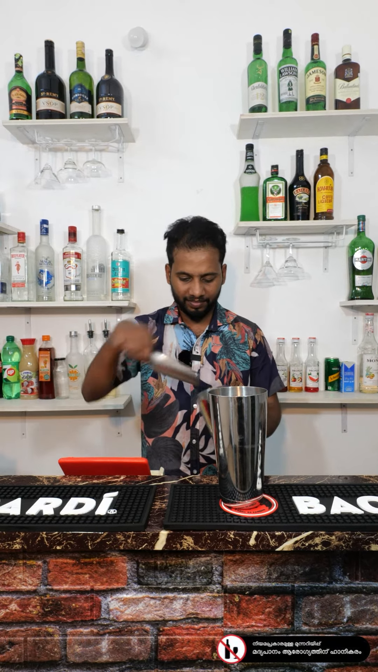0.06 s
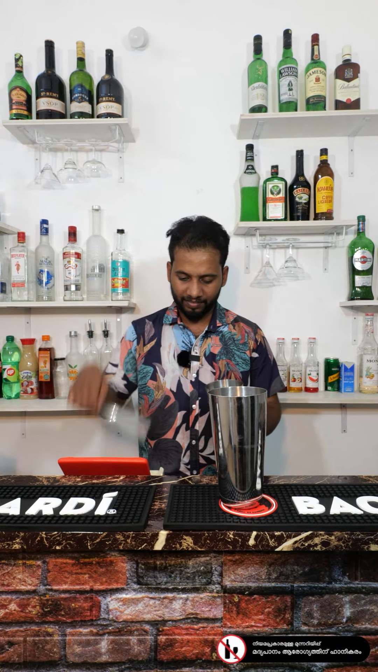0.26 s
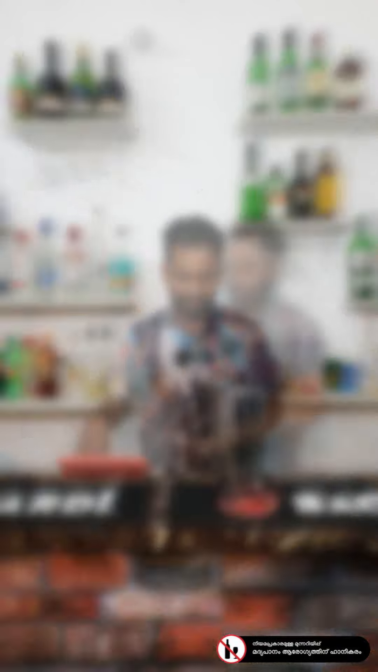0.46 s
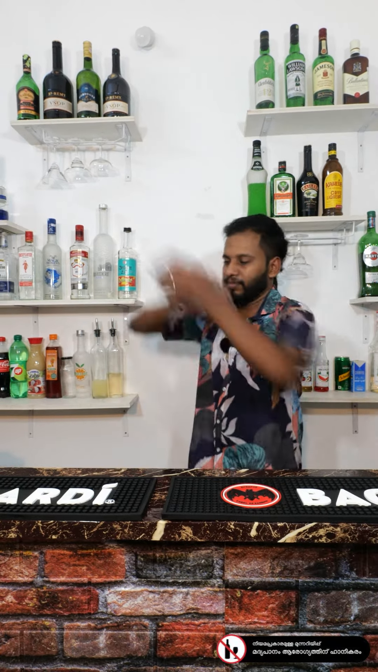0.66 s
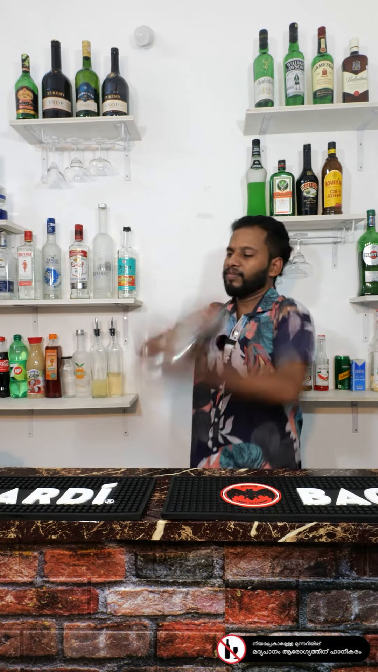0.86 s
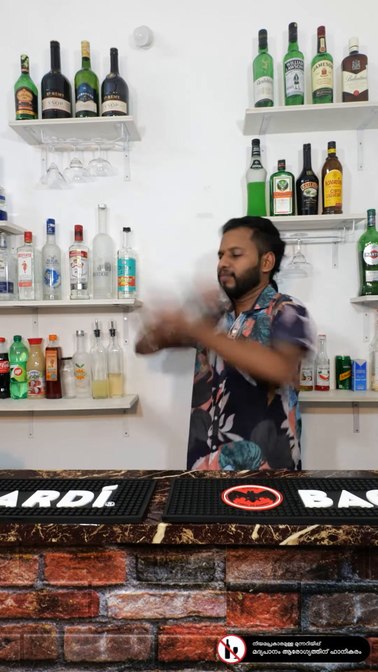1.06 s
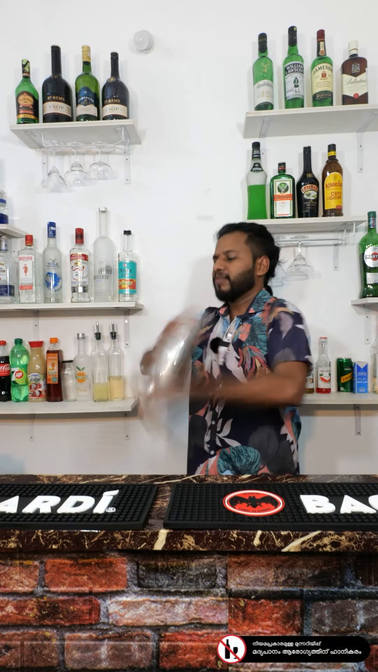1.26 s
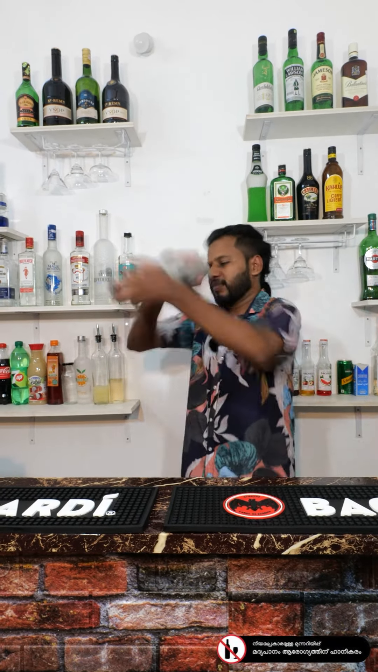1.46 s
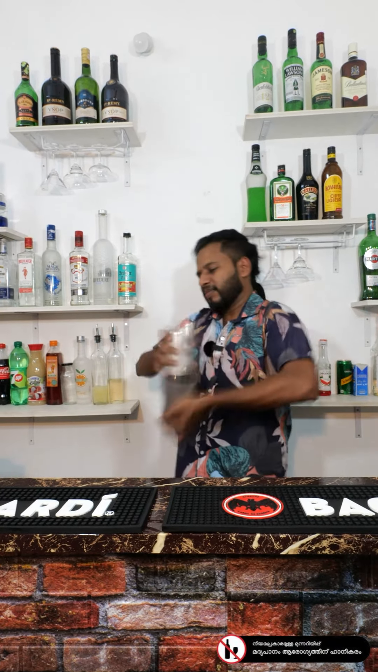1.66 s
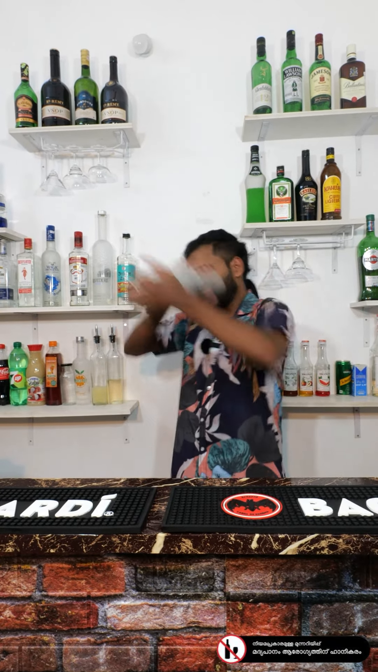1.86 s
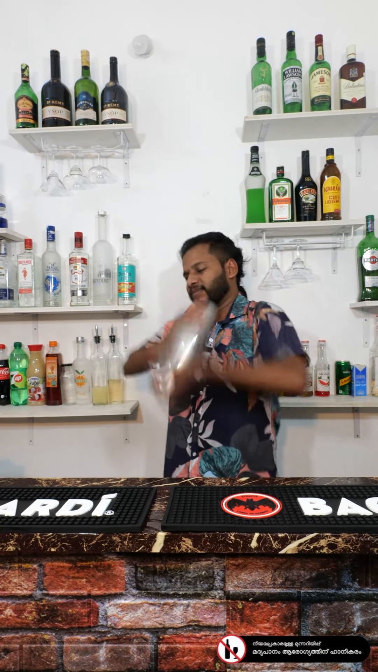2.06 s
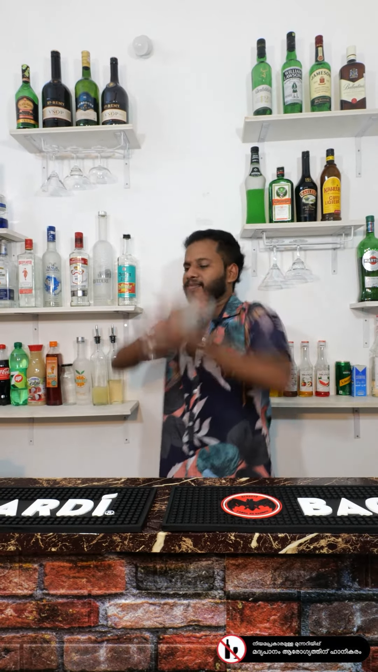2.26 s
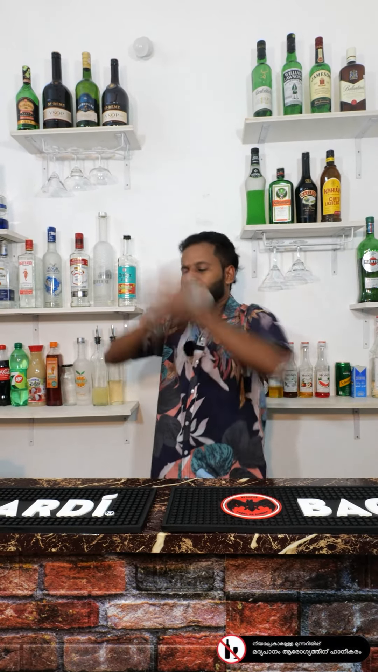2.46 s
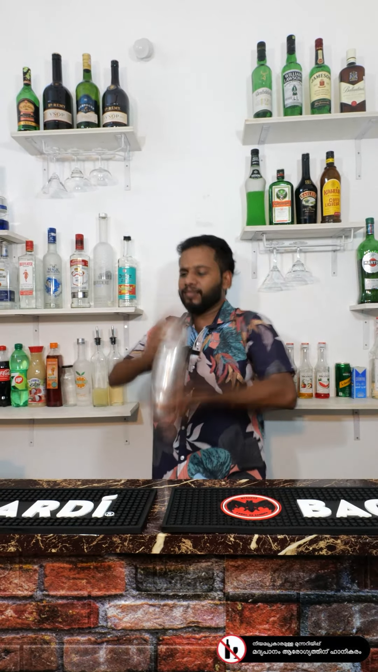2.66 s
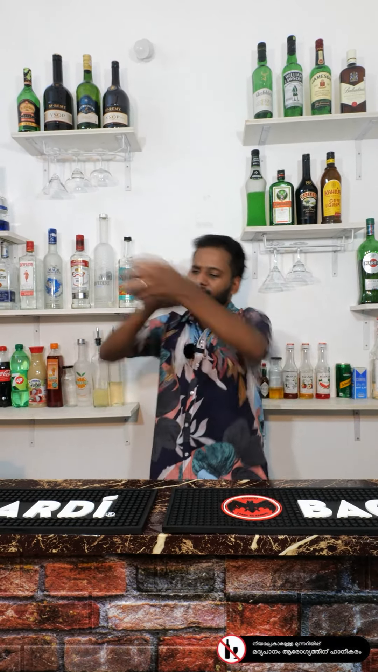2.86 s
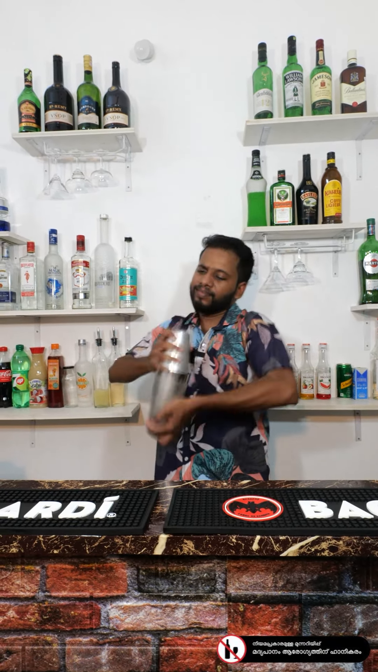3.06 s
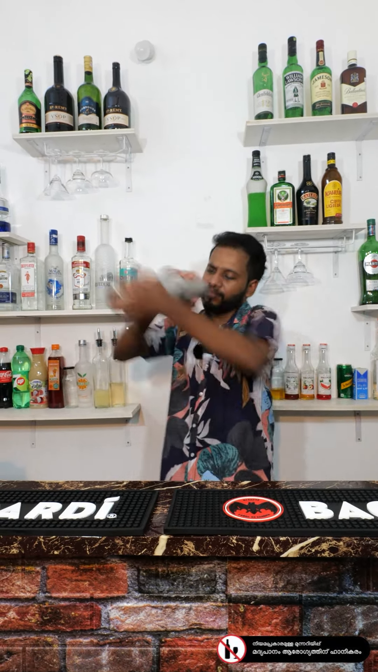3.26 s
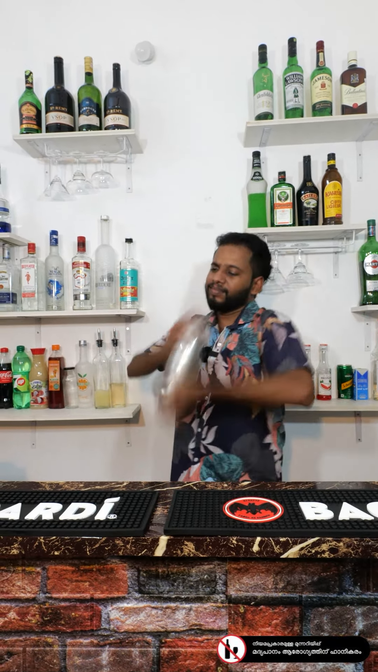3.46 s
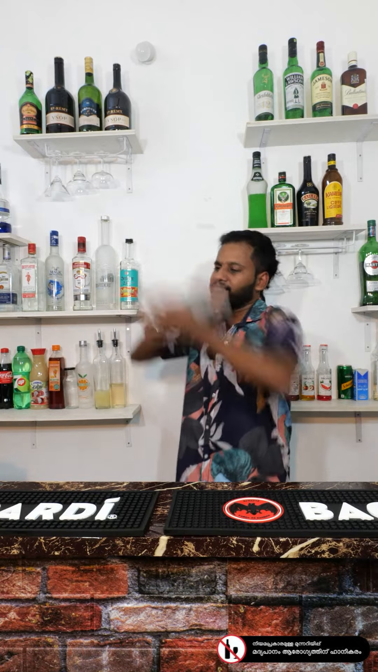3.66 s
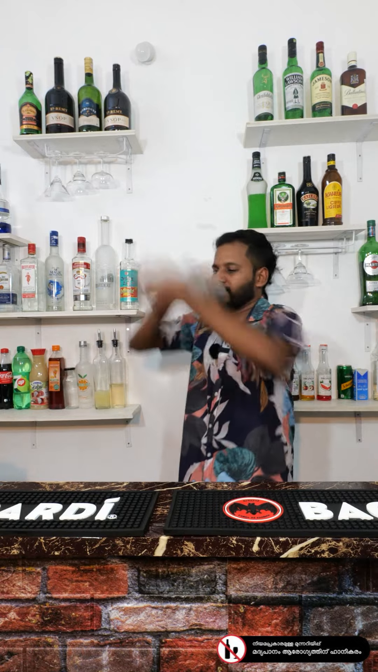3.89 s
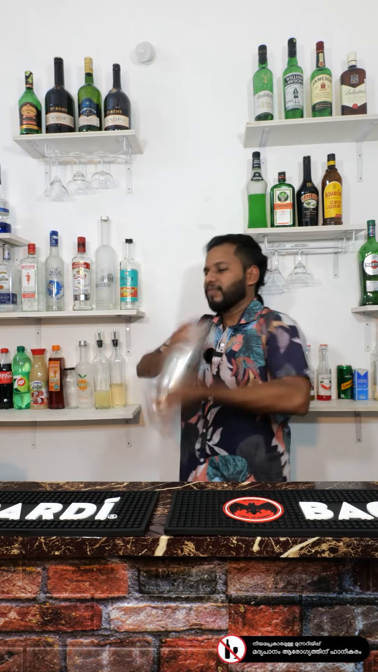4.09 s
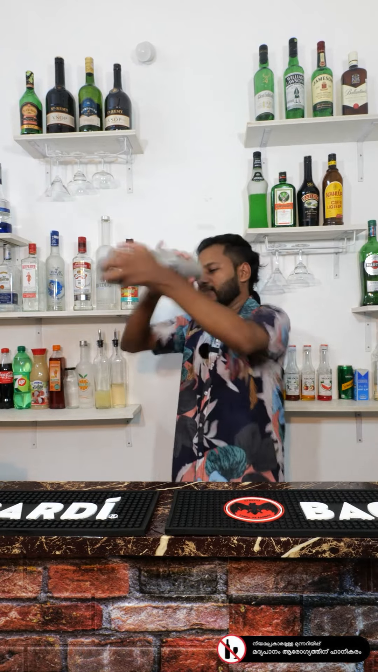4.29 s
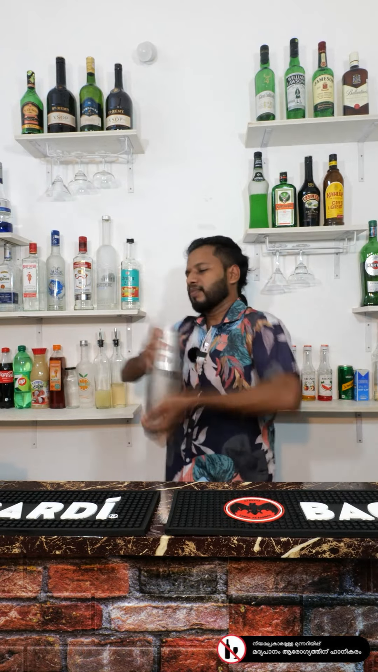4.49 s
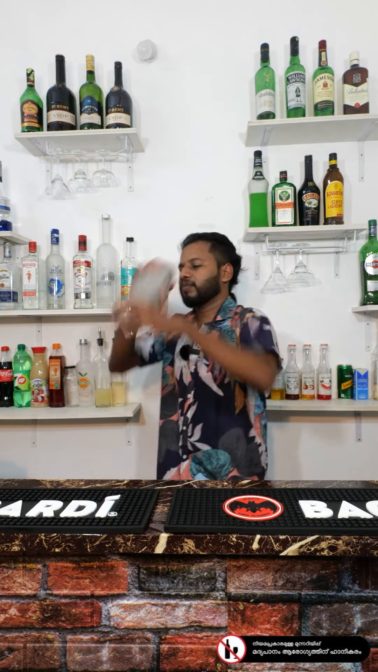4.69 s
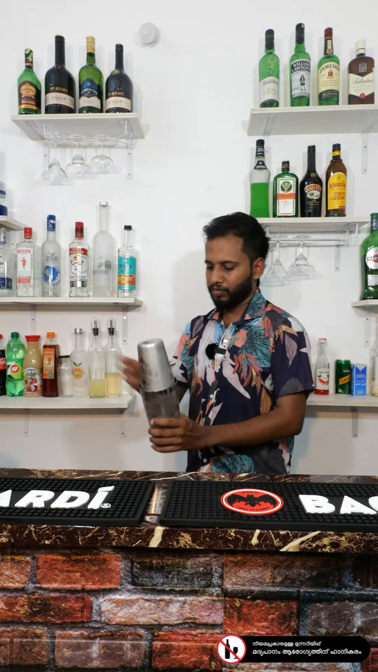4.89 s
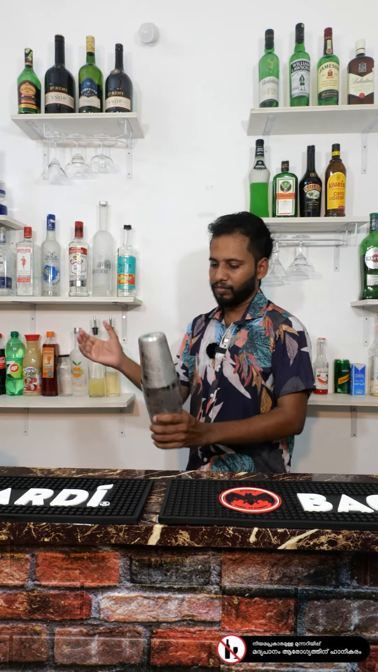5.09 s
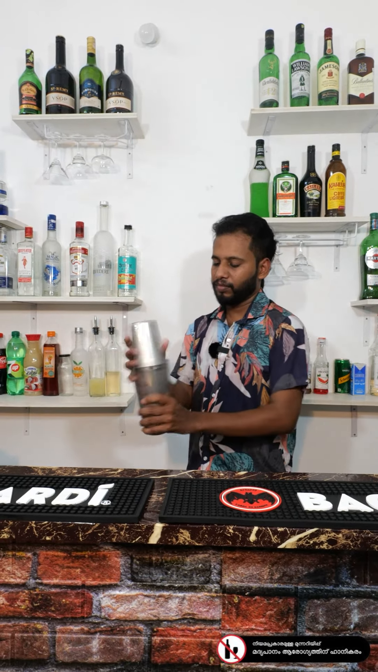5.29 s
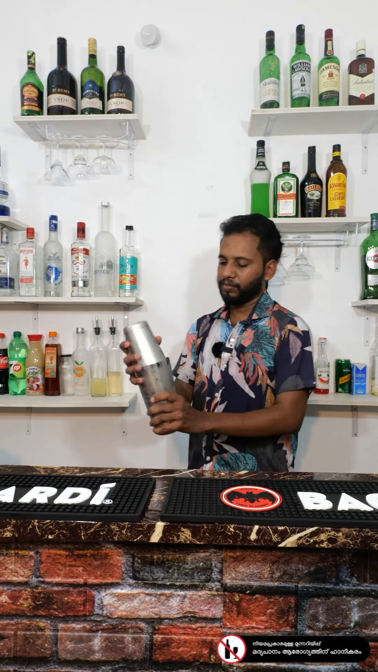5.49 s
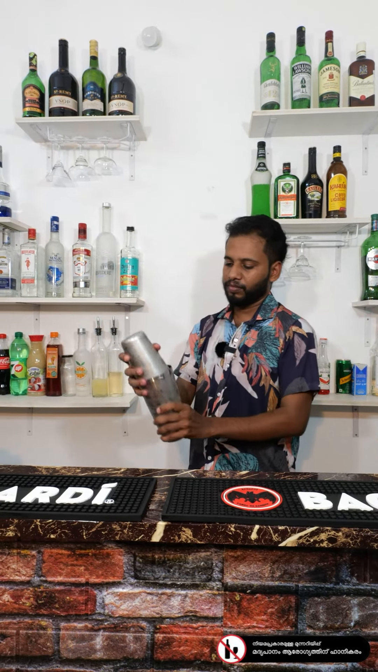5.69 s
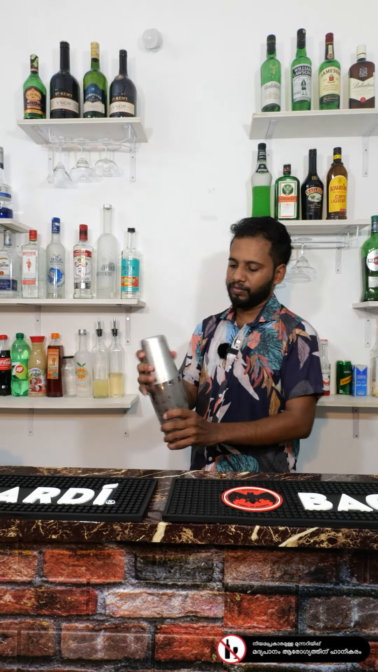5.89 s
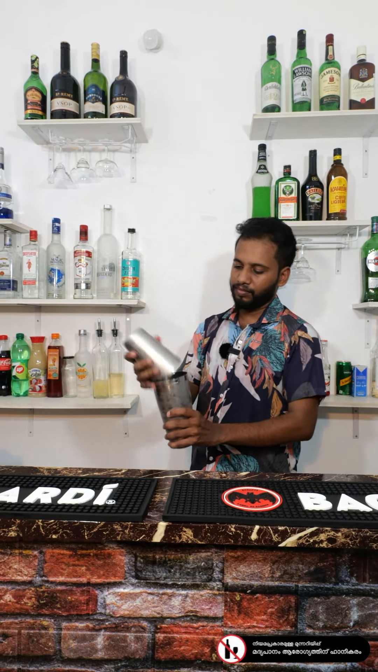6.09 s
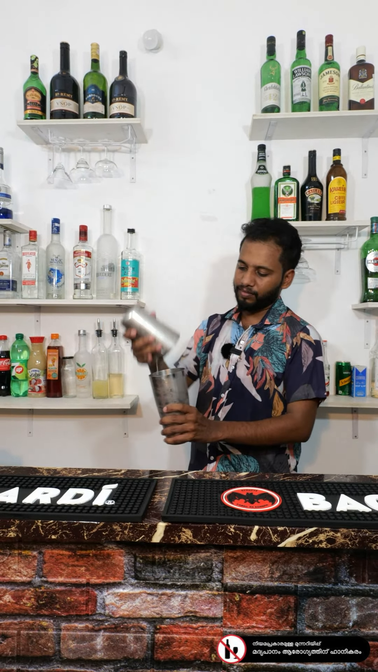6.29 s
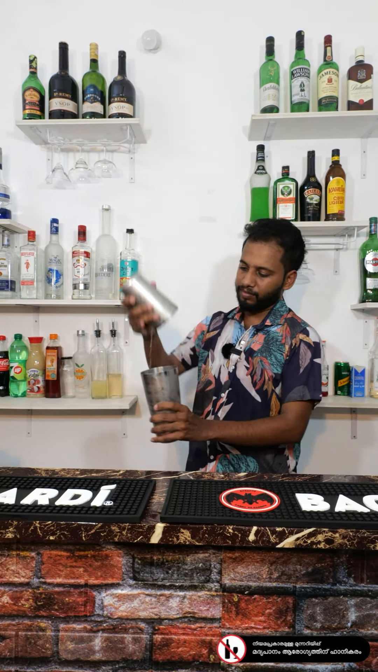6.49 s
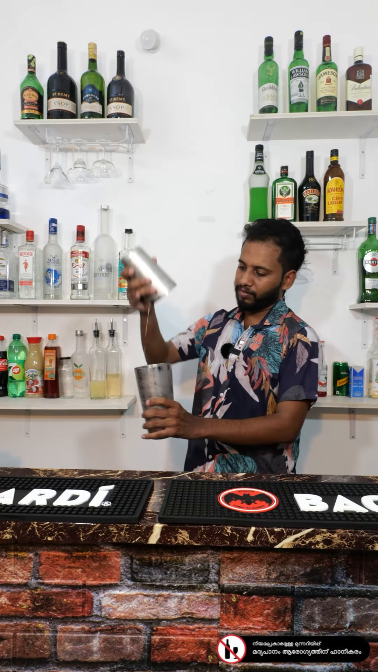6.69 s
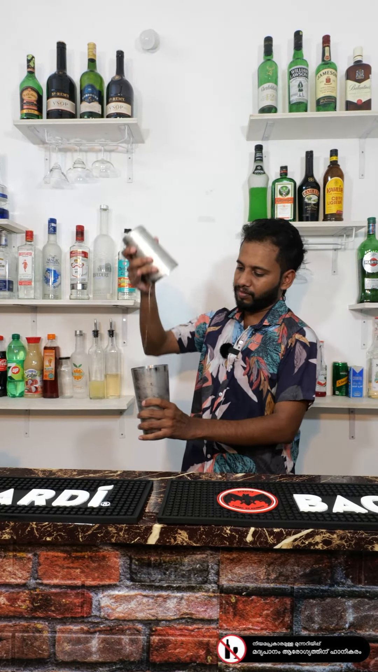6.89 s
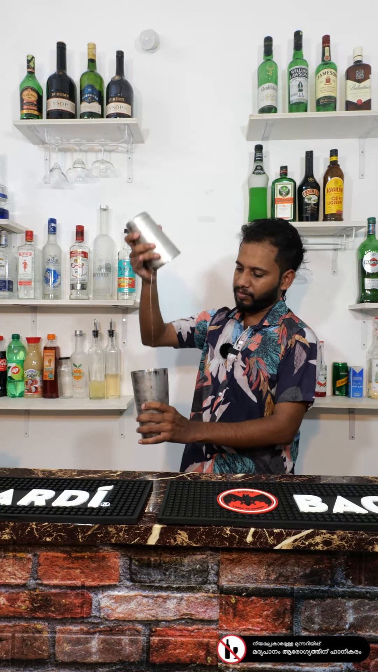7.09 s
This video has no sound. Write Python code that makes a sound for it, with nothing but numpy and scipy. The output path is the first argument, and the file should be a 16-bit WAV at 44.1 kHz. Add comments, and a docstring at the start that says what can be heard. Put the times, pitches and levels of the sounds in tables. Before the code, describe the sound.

Loud ice and liquid crash end to end inside a steel shaker, then stop; a slap cracks the seal and cubes knock softly.

```python
"""Ice and drink are shaken hard between two steel tins in a small bare room: the cubes crash from end to end.
Before that, ice slides into the open tin and the second tin is clapped on; afterwards a slap of the palm
breaks the seal, the tins scrape apart and the ice bobs to rest. Ice and steel are struck banks of decaying modes,
liquid is damped tones of rising pitch, the scrape is shaped noise.
The microphone is close and overloads on the hardest blows."""
import sys
import numpy as np
from scipy import signal
from scipy.fft import rfft, irfft
from scipy.io import wavfile
from scipy.ndimage import uniform_filter1d

SR = 44100
rng = np.random.default_rng(int(sys.argv[2]) if len(sys.argv) > 2 else 0)


def transcribe(u):
    """Save the signal u as a 16-bit wav file named by the first command-line argument.

    u: samples, shape (n,) or (channels, n), limited to [-1, 1]; the rate is SR.
    q: integer samples, one column per channel.
    """
    v = np.clip(np.atleast_2d(u).T, -1, 1)
    q = np.round(v * 32767).astype(np.int16)
    wavfile.write(sys.argv[1], SR, q)


N = 315043

# spectrum of ice on the closed shaker: (frequency [Hz], density [dB per Hz])
SHAKE_COLOUR = [(59, -53), (100, -22.5), (302, -19), (358, -12.5), (558, -8.5), (1030, -7.5), (1420, -8),
                (1870, -3.5), (2080, -10.5), (2630, -3.5), (3470, -8.5), (4870, -6.5), (7610, -9.5),
                (11900, -20), (16000, -35.5)]
# hand blows that close and open the shaker:
# (time [s], relative crack [dB], thump [dB], thump pitch [Hz], relative rim ring [dB])
HAND_BLOWS = [(0.525, -20, -17, 412.5, -23), (0.586, -17, -30, 524, -34), (0.613, -20, -50, 600, -34.5),
              (5.349, -5.5, -3.5, 219.5, -39.5), (5.352, -7, -2, 620, -32)]
GATHER_DB_PER_S = 703.5   # a steep rise: the first cubes arrive just ahead of the pack
CHURN_DB = -30.5   # the cubes jostling in flight between crashes


def amp(db):
    """Decibels to gain."""
    return 10 ** (np.asarray(db) / 20)


def rms_one(x):
    """Scale to unit rms."""
    return x / np.sqrt(np.mean(x ** 2) + 1e-20)


def at_hz(points, hz):
    """Read a table on a log-frequency axis."""
    f, value = np.transpose(points)
    return np.interp(np.log(np.maximum(hz, 1)), np.log(f), value)


def clicks(at, sizes):
    """Impulses at the given samples."""
    return np.bincount(at, sizes, N)[:N] + 1e-18


def samples(s):
    """Seconds to sample numbers."""
    return np.clip(np.round(np.asarray(s) * SR).astype(int), 0, N - 1)


def swell(start_s, hold_s, rise_db_per_s, fall_db_per_s):
    """Attack up to the start, hold and release, in dB below the top."""
    age = np.arange(N) / SR - start_s
    attack = age * rise_db_per_s
    release = (hold_s - age) * fall_db_per_s
    return np.minimum(0, np.minimum(attack, release))


def ring(x, hz, t60):
    """A two-pole resonator: a unit click sets a tone of height 1 ringing."""
    r = np.exp(-np.log(1000) / (t60 * SR))
    w = 2 * np.pi * hz / SR
    return signal.lfilter([.5, 0, -.5], [1, -2 * r * np.cos(w), r * r], x)


def strike(at, sizes, modes):
    """Each contact meets each mode with a random strength of its own."""
    out = np.zeros(N)
    for hz, db, t60 in modes:
        hits = clicks(at, sizes * rng.standard_normal(len(at)))
        out += ring(hits, hz, t60) * amp(db)
    return out


def coloured(x, spectrum):
    """Shape a noise to a spectrum; rms 1."""
    hz = np.arange(N // 2 + 1) * SR / N
    return rms_one(irfft(rfft(x) * amp(at_hz(spectrum, hz)), N))


def tumble(level_db, per_s, spread_db):
    """Random contacts of uneven size that share out the power of a level curve: (samples, sizes)."""
    at = np.flatnonzero((rng.random(N) < per_s / SR) & (level_db > -100))
    sizes = amp(spread_db * rng.standard_normal(len(at)))
    power = uniform_filter1d(clicks(at, sizes ** 2), size=1300)   # over about 30 ms
    return at, sizes / np.sqrt(power[at]) * amp(level_db[at])


def clacks(at, sizes, treble_db, colour, ring_s, count=88):
    """Each contact of ice rings briefly with its own mix of crowded modes, the high ones shortest."""
    pitches = np.linspace(110 ** .5, 15800 ** .5, count) ** 2
    share = amp(at_hz(colour, pitches)) * np.sqrt(np.gradient(pitches))
    share /= np.linalg.norm(share)
    mix, out = rng.standard_normal((len(at), count)), np.zeros(N)
    for k, hz in enumerate(pitches):
        t60 = ring_s * np.sqrt(2000 / hz)
        hard = 1 / (1 + (3500 / hz) ** 4)   # dry, hard contacts add treble; wet ones lack it
        height = share[k] * np.sqrt(4 * np.log(1000) / (t60 * SR))   # evens out the energy of long and short rings
        hits = clicks(at, sizes * mix[:, k] * amp(hard * treble_db))
        out += ring(hits, hz, t60) * height
    return out


def plops(at, sizes, pitches, cycles, rise):
    """Damped tones that swell in half a cycle, ring for some cycles (to -60 dB) and can rise in pitch."""
    out = np.zeros(N + SR)
    for i, size, hz in zip(at, sizes, pitches):
        age = np.linspace(0, 1, int(cycles / hz * SR))
        envelope = np.minimum(2 * cycles * age, 1) * np.exp(-np.log(1000) * age)
        tone = np.sin(2 * np.pi * cycles * age * (1 + rise * age))
        out[i:i + len(age)] += size * envelope * tone
    return out[:N]


def still_air():
    """Steady noise of the quiet room, shaped to a spectrum."""
    # room noise: (frequency [Hz], density [dB per Hz])
    air_colour = [(15, -56.5), (25, -18.5), (76, -15), (127, -2.5), (161, -7), (229, -7), (354, -9.5),
                  (427, -11.5), (531, -14.5), (2050, -23.5), (4870, -29), (10700, -29), (16000, -51.5)]
    return amp(-52.5) * coloured(rng.standard_normal(N), air_colour)


def room(x, wet_db, tilt_db):
    """Bare walls return a diffuse tail: bands of noise, each with its own decay."""
    # reverberation of the walls: (frequency [Hz], decay to -60 dB [s])
    room_decay = [(100, 0.82), (300, .65), (1000, 0.39), (4000, 0.67), (14000, 0.2)]
    t, tail = np.arange(SR) / SR, 0
    edges = np.geomspace(60, 17000, 9)
    for low, high in zip(edges, edges[1:]):
        hz = np.sqrt(low * high)
        band_filter = signal.butter(2, [low, high], "band", fs=SR, output="sos")
        band = signal.sosfilt(band_filter, rng.standard_normal(len(t)))
        decay = np.exp(-np.log(1000) * t / at_hz(room_decay, hz))
        tail = tail + band * decay * amp(tilt_db * np.log2(hz / 2000))
    tail *= np.clip((t - .004) / 0.0015, 0, 1)   # the tail starts after 4 ms
    return x + amp(wet_db) * signal.fftconvolve(x, tail / np.linalg.norm(tail))[:N]


def bumps():
    """Dull, short low thuds, from the shaker and from handling of the microphone: tones of a few cycles."""
    # thuds: (time [s], level [dB], pitch [Hz])
    thuds = [(1.289, -29, 260), (1.657, -24, 177), (1.659, -12.5, 400), (2.209, -27, 270), (4.32, -35, 125),
             (4.409, -33, 111.4), (4.501, -26, 200), (4.867, -34, 118), (5.86, -38, 75)]
    s, peak_db, pitch_hz = np.transpose(thuds)
    return plops(samples(s), amp(peak_db), pitch_hz, cycles=9, rise=0)


def pour():
    """Cubes slide and drop into the open tin; its air column hoots and its wall rings under the fading slide."""
    # cubes landing in the tin: (time [s], relative level [dB], relative treble [dB])
    landings = [(0.002, -7, -14), (0.01, -18, -16), (0.068, -12, -24), (0.111, -4, -25),
                (0.203, -13.5, -11), (0.245, -9.5, -28), (0.288, -13.5, -22), (0.36, -18.5, -14.5)]
    # steel wall and air column of the open tin: (frequency [Hz], relative level [dB], decay to -60 dB [s])
    open_tin = [(691, -7, 0.17), (720, 4, 0.089), (1375, -15.5, 0.24), (1880, -13, 0.68), (2470, -16, 0.24),
                (3300, -24, 0.33), (3970, -15.5, 0.37), (4280, -15, .15), (6460, -18, 0.17)]
    # spectrum of the sliding ice: (frequency [Hz], density [dB per Hz])
    pour_colour = [(120, -60), (200, -29), (456, -17.5), (722, -5.5), (933, -26), (1400, -5.5),
                   (1650, -13.5), (1910, -12), (3190, -16.5), (4860, -17), (16000, -42.5)]
    t = np.arange(N) / SR
    # the slide thins out steadily at 43 dB per s, then from 0.34 s the sound is faded out quickly
    level_db = -24 - 43 * t - 261 * np.maximum(t - 0.34, 0)
    at, sizes = tumble(level_db - 5, per_s=300, spread_db=4)
    slide = clacks(at, sizes, 0, pour_colour, ring_s=0.041)
    s, peak_db, treble_db = np.transpose(landings)
    dry_db = treble_db - np.mean(treble_db) + 3
    drops = clacks(samples(s), amp(peak_db + 9.5), dry_db, pour_colour, ring_s=0.057)
    wall = strike(at, sizes / amp(level_db[at]), open_tin)   # even strikes, faded below
    return slide + drops + wall * amp(level_db - 1.5) / np.std(wall[:at[-1]])


def settle():
    """Floating cubes knock dully on the wall, with short pitched plops and a faint squeak."""
    # a jolt sets the ice bobbing, and it calms steadily: (time [s], relative level [dB], die-away [dB per s])
    bobs = [(4.968, -18.5, 53), (5.354, -33, 16)]
    # cubes nudging the wall under the liquid, and a faint squeak at 6.48 s:
    # (time [s], relative level [dB], pitch [Hz])
    nudges = [(5.4443, -11, 1600), (5.4594, -12, 1940), (5.501, -17, 1280), (5.5722, -13, 1850),
              (5.5928, -10, 1750), (5.6092, -13, 1760), (5.653, -17, 1700), (5.694, -19, 1770),
              (5.83, -14, 1710), (5.907, -16, 1650), (6.016, -16.5, 2460), (6.1563, -21.5, 1540),
              (6.249, -21, 1350), (6.313, -20, 1550), (6.4668, -20, 1610), (6.48, -30, 653),
              (6.556, -18, 1760), (6.618, -29.5, 1900), (6.7368, -25, 2040), (6.8756, -36, 2240),
              (7.0329, -32, 3030), (7.0466, -32, 1680)]
    # spectrum of the wet knocks: (frequency [Hz], density [dB per Hz])
    settle_colour = [(180, -58.5), (300, -31), (360, -22), (418, -38), (634, -16), (930, -19.5), (1750, -6),
                     (2100, -9.5), (4230, -14.5), (7820, -42), (16000, -43)]
    level_db = np.max([db + swell(s, 0, GATHER_DB_PER_S, fall) for s, db, fall in bobs], axis=0)
    at, sizes = tumble(level_db - 5.5, per_s=220, spread_db=6)
    s, peak_db, pitch_hz = np.transpose(nudges)
    nudge_at = samples(s)
    all_at, all_sizes = np.r_[at, nudge_at], np.r_[sizes, amp(peak_db + 5)]
    knocks = clacks(all_at, all_sizes, -1.0, settle_colour, ring_s=0.05)
    small_at, small_sizes = tumble(level_db - 18, per_s=120, spread_db=1.5)
    small_hz = 1750 * 2 ** (0.185 * rng.standard_normal(len(small_at)))
    small = plops(small_at, small_sizes, small_hz, cycles=25, rise=0.023)
    return knocks + small + plops(nudge_at, amp(peak_db - 8.5), pitch_hz, cycles=53, rise=0.033)


def scrape():
    """Wet steel slips over steel in a dense run of tiny catches."""
    # the rims slip over each other as the tins part: (time [s], level [dB], length [s])
    slips = [(5.359, -23, 0.016), (5.59, -33.5, 0.0072), (5.788, -40.5, 0.014), (5.854, -32.5, 0.024),
             (6.002, -35.5, 0.032), (6.1, -42.5, .08), (6.317, -47, 0.053), (6.467, -46, .012),
             (6.555, -52.5, 0.082)]
    # spectrum of the scrape: (frequency [Hz], density [dB per Hz])
    scrape_colour = [(290, -30), (500, -10), (688, -9), (761, -17), (1440, -6.5), (1690, -5.5), (4730, -5),
                     (9920, -11.5), (16000, -28)]
    rise_db_per_s, fall_db_per_s = 700, 300
    # light rubbing between the slips dies away at 17.5 dB per s
    level_db = -41 + swell(slips[0][0], 0, rise_db_per_s, 17.5)
    for s, db, length_s in slips:
        level_db = np.maximum(level_db, db + swell(s, length_s, rise_db_per_s, fall_db_per_s))
    catches = rng.standard_normal(N) * (rng.random(N) < 5000 / SR)   # 5000 per s
    catches = catches * amp(3 * rng.standard_normal(N))
    return amp(level_db) * coloured(catches, scrape_colour)


def slaps():
    """A hand strikes the shaker: a soft thump, a crack of steel and a ring of the free rim; the room booms after it."""
    # free rim of the tin: (frequency [Hz], relative level [dB], decay to -60 dB [s])
    rim_modes = [(2620, -14, .05), (3220, -14, .05), (3990, -8, 0.055), (4130, -6.5, .06),
                 (4580, -7.5, 0.056), (5130, -1.5, .055), (6100, -8, .045), (6750, -12, .045),
                 (7450, -1, .055), (7530, -8, .05), (8460, 1, .045), (9800, 0, .03)]
    # low resonances of the room: (frequency [Hz], relative level [dB], decay to -60 dB [s])
    room_modes = [(116, -4.5, .6), (163.8, -1, 1), (220, -3, 0.55), (267, -5.5, 0.48), (313, -5.5, 0.32),
                  (363, -5.5, 0.43), (593, -1, 0.17), (680, -11, 0.227)]
    s, crack_db, thump_db, thump_hz, rim_db = np.transpose(HAND_BLOWS)
    at = samples(s)
    thump = plops(at, amp(thump_db), thump_hz, cycles=4.1, rise=0)
    crack = clacks(at, amp(crack_db + 13.5), 2.1, SHAKE_COLOUR, ring_s=0.0074)
    rim = sum(ring(clicks(at, amp(rim_db + db)), hz, t60) for hz, db, t60 in rim_modes)
    # the deeper the thump, the more it booms
    push = clicks(at, amp(thump_db - 28.5) * thump_hz.min() / thump_hz)
    boom = sum(ring(push, hz, t60) * amp(db) for hz, db, t60 in room_modes)
    return thump + crack + rim + boom


def chimes():
    """A grazing cube sets a wall mode singing; the note swells briefly, and higher modes die sooner."""
    # the wall sings out when hit while clear of the liquid: (time [s], level [dB], mode [Hz])
    touches = [(1.325, -16, 3700), (2.255, -21, 1954), (2.625, -18.5, 1890), (2.855, -24, 1890),
               (2.942, -19, 1910), (4.04, -22, 1908), (4.245, -22, 1903), (4.735, -19.5, 3730),
               (4.772, -21.5, 1900), (4.965, -20, 1948), (5.09, -23.5, 1904)]
    out = np.zeros(N)
    for s, db, hz in touches:
        touch = clicks(samples([s]), [amp(db)])
        # taking away a short ring softens the attack
        out += ring(touch, hz, t60=620 / hz) - ring(touch, hz, t60=0.026)
    return out


def slosh(body_db):
    """The drink traps air: early gulps, and many small pockets that ring harder the harder the load tumbles."""
    # big gulps of air as cubes plunge and the liquid turns over: (time [s], level [dB], pitch [Hz])
    big_gulps = [(0.245, -16.5, 1330), (0.538, -28, 330), (0.545, -22.5, 550), (0.566, -23.5, 474),
                 (0.568, -21.5, 822), (0.58, -21, 1787), (0.665, -25.5, 1030), (0.694, -21, 1100),
                 (0.761, -18.5, 960), (0.808, -17, 874), (0.824, -11.5, 996), (0.877, -11, 1528)]
    at, sizes = tumble(body_db - 21, per_s=170, spread_db=9.5)
    pocket_hz = 2060 * 2 ** (.27 * rng.standard_normal(len(at)))   # spread in octaves
    pockets = plops(at, sizes, pocket_hz, cycles=41.4, rise=0.034)
    s, peak_db, gulp_hz = np.transpose(big_gulps)
    return pockets + plops(samples(s), amp(peak_db), gulp_hz, cycles=47, rise=0.21)


def load_levels():
    """Level of the tumbling load and of its hard, dry contacts, in dB: crashes standing out of a steady churn."""
    # the load arrives at one end of the shaker, about twice per stroke:
    # (time [s], level [dB], pile-up length [s], relative treble [dB], die-away [dB per s])
    crashes = [(0.52, -29, .07, -8, 203.5), (0.707, -21, .04, 1.5, 151.5), (0.793, -18.5, 0.1, 1, 122),
               (0.941, -15, 0.1, -5, 185), (1.177, -19, 0.041, -3.5, 180.5), (1.297, -17.5, 0.1, -2, 184),
               (1.536, -24.5, .025, -0.5, 129), (1.664, -16.5, 0.01, -1, 204),
               (1.723, -15, 0.026, -3, 208.5), (1.861, -21.5, 0.043, 0.5, 175),
               (1.986, -26, 0.027, 0.5, 175.5), (2.06, -14.5, 0.031, -2.5, 189),
               (2.205, -15.5, 0.012, -4.5, 124), (2.389, -14.5, 0.051, -6.5, 148),
               (2.532, -20.5, 0.098, -3, 166), (2.708, -17, 0.069, -5, 191),
               (2.976, -17.5, 0.015, -3.5, 283), (3.071, -17, 0.098, -3, 256),
               (3.283, -19, 0.061, -2.5, 146), (3.413, -25.5, 0.098, 1.5, 169),
               (3.468, -15, .04, -12.5, 252), (3.623, -18, 0.063, -4, 132.5), (3.75, -24.5, .04, 3.5, 178),
               (3.813, -18, 0.052, -4, 150), (3.963, -18, 0.022, -4, 95), (4.145, -16.5, 0.066, -2.5, 118),
               (4.315, -17.5, 0.022, -2.5, 124), (4.409, -21, 0.029, 1.5, 203),
               (4.502, -17, 0.071, -5.5, 209), (4.682, -22.5, 0.028, 0, 144),
               (4.763, -22, 0.013, -2.5, 123), (4.966, -24, 0.045, -1, 60)]
    # the churn lasts as long as the arms swing
    swing_start_s, swing_s, swing_stop_db_per_s = .7, 4.05, 90
    body_db = CHURN_DB + swell(swing_start_s, swing_s, GATHER_DB_PER_S, swing_stop_db_per_s)
    top_db = body_db - 3
    for s, db, hold_s, treble_db, fall in crashes:
        crash_db = db + swell(s, hold_s, GATHER_DB_PER_S, fall)
        body_db = np.maximum(body_db, crash_db)
        top_db = np.maximum(top_db, crash_db + treble_db)
    closed = np.arange(N) / SR > HAND_BLOWS[0][0]
    return np.where(closed, [body_db, top_db], -120)


def shake(body_db, top_db):
    """At each end of a stroke the load piles into the steel: a few hard blows amid a swarm of small contacts."""
    # the hardest blows of ice: (time [s], relative level [dB], relative treble [dB], knock pitch [Hz])
    hard_blows = [(0.667, -8.5, -14.5, 2180), (0.699, -8, -16, 1680), (0.95, 0.5, -22, 1760),
                  (0.995, 7, -34.5, 1960), (1.017, 9, -17.5, 1670), (1.079, -6, -5.5, 1730),
                  (1.179, -5.5, 1.5, 2240), (1.287, -10, 10.5, 1920), (1.304, 4.5, -11, 1780),
                  (1.353, 2, -46, 2390), (1.396, 3.5, -11.5, 2200), (1.538, 1, -28, 2500),
                  (1.658, 6.5, -15, 2268), (1.712, 11.5, -15.5, 1636), (1.753, 3, -3, 1810),
                  (1.859, -1, -21, 2323), (2.017, 1.5, -22, 1950), (2.058, 5, -20.5, 2730),
                  (2.197, 1, -14, 2000), (2.209, 2.5, -10.5, 1880), (2.41, 7, -16.5, 1740),
                  (2.441, -2, -8.5, 1780), (2.508, -1.5, -7, 1880), (2.529, -3.5, -13, 2100),
                  (2.628, -4, -11, 2020), (2.714, 0.5, -6, 1430), (2.737, 2.5, -28, 1860),
                  (2.77, 10.5, -41.5, 2720), (2.782, 9.5, -13.5, 1847), (2.906, -1.5, -21, 2170),
                  (3.072, 2, -6.5, 1957), (3.121, 4, -39, 2350), (3.149, 4.5, -11.5, 1600),
                  (3.34, -0.5, -22, 957), (3.418, 0.5, -13.5, 1803), (3.467, 0.5, -19.5, 1890),
                  (3.5, 9, -22.5, 1660), (3.532, 5, -17, 1770), (3.752, 3.5, -12, 1850),
                  (3.779, 1.5, -9.5, 1790), (3.856, 9.5, -26.5, 1725), (3.929, -3.5, -5.5, 2150),
                  (4.093, -1, -5.5, 2720), (4.154, -6, 7, 2020), (4.188, 8.5, -24.5, 1946),
                  (4.309, 2.5, -16.5, 1850), (4.5, 9.5, -9.5, 1980), (4.544, 3, -9.5, 2500),
                  (4.664, 3, -22, 1920), (4.687, 7, -26, 2528), (4.816, -10.5, -5.5, 1800)]
    # steel wall, damped by the hands: (frequency [Hz], relative level [dB], decay to -60 dB [s])
    closed_tin = [(1908, -1.5, 0.16), (2400, -2.5, 0.1), (2513, 3.5, 0.036), (2712, -0.5, 0.079),
                  (2806, -3, .06), (3655, -7.5, 0.11), (4710, -4.5, 0.083), (7140, -18, 0.055)]
    ice_ring_s = .015   # to -60 dB at 2 kHz
    at, sizes = tumble(body_db - 1, per_s=850, spread_db=3)

    # single cubes hit the wall on their own, 22 per s, and follow 0.27 of the load's swing in level
    stray_at = np.flatnonzero((rng.random(N) < 22 / SR) & (body_db >= CHURN_DB))
    follow_db = 0.27 * (body_db[stray_at] - body_db.max())
    stray_sizes = amp(3.5 + follow_db + 2 * rng.standard_normal(len(stray_at)))
    at, sizes = np.r_[at, stray_at], np.r_[sizes, stray_sizes]
    hardness_db = (top_db - body_db)[at] + 2 + 1.94 * rng.standard_normal(len(at))
    swarm = clacks(at, sizes, hardness_db, SHAKE_COLOUR, ring_s=ice_ring_s)

    s, peak_db, treble_db, knock_hz = np.transpose(hard_blows)
    hit_at, hit_sizes = samples(s), amp(peak_db + 7)
    dry_db = treble_db - np.mean(treble_db)
    blows = clacks(hit_at, hit_sizes, dry_db - 4.6, SHAKE_COLOUR, ring_s=ice_ring_s)
    # a cube that lands through the liquid gives less crack and more pitched knock
    knocks = plops(hit_at, amp(peak_db - 11.5 - 0.19 * dry_db), knock_hz, cycles=44, rise=0.014)
    # each blow also jolts the whole shaker in the hands, around 66 Hz
    jolt_hz = 66 * 2 ** (.4 * rng.standard_normal(len(s)))
    jolts = plops(hit_at, amp(peak_db - 45.5), jolt_hz, cycles=5, rise=0)
    wall = strike(np.r_[at, hit_at], np.r_[sizes, hit_sizes], closed_tin)
    return swarm + blows + knocks + jolts + amp(-36.5) * wall


def scene():
    """The shaker in its room, over still air."""
    body_db, top_db = load_levels()
    shaken = shake(body_db, top_db) + slosh(body_db) + chimes()
    near = room(pour() + shaken + settle() + scrape(), wet_db=-12, tilt_db=1.2)
    struck = room(slaps(), wet_db=-5.5, tilt_db=1.2)
    return (near + struck + bumps() + still_air())[None]


def record(dry):
    """The microphone overloads: the hardest peaks are flattened, and the top is cut above 16.1 kHz."""
    held = dry / (1 + dry ** 6) ** (1 / 6)
    return signal.sosfilt(signal.ellip(10, .2, 80, 16100, fs=SR, output="sos"), held)


dry = scene()
out = record(dry)
transcribe(out)
```